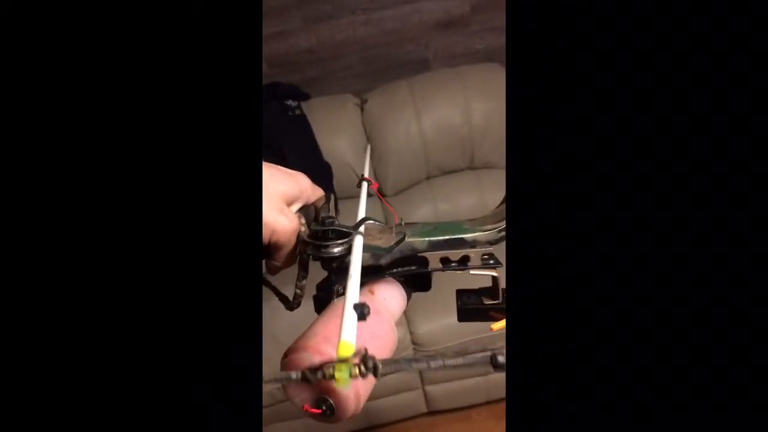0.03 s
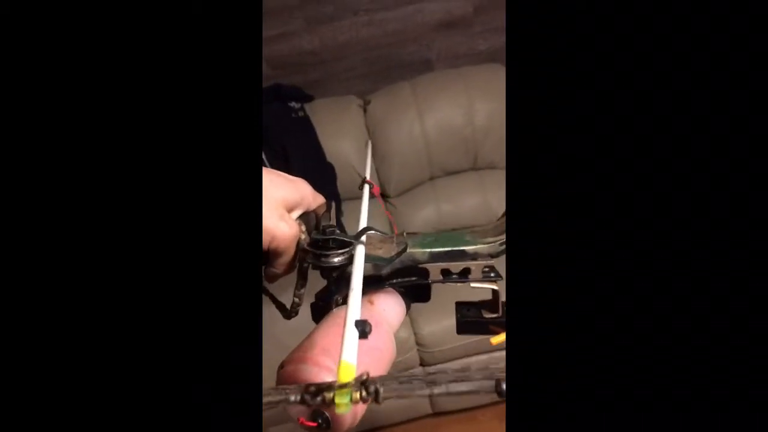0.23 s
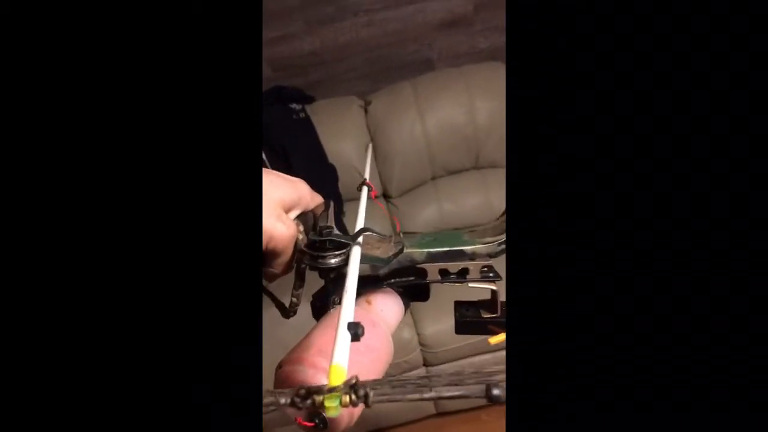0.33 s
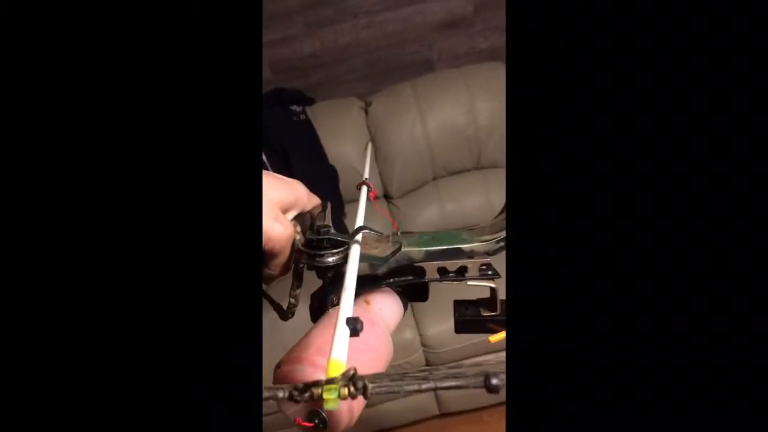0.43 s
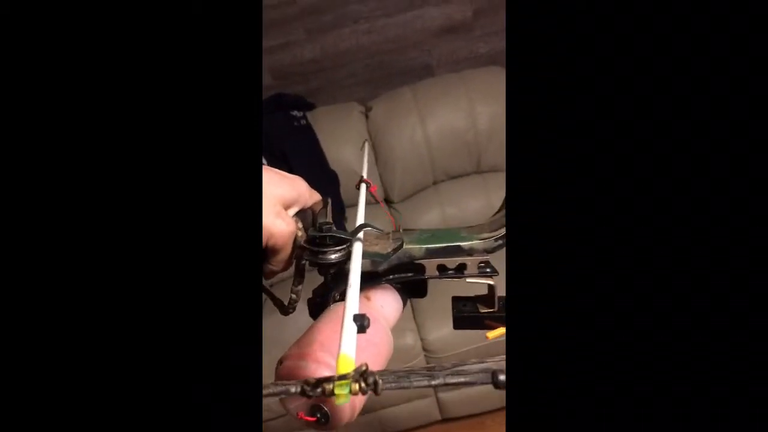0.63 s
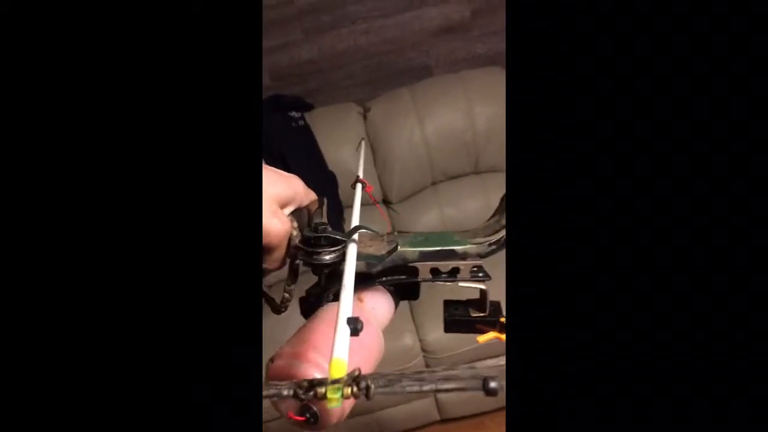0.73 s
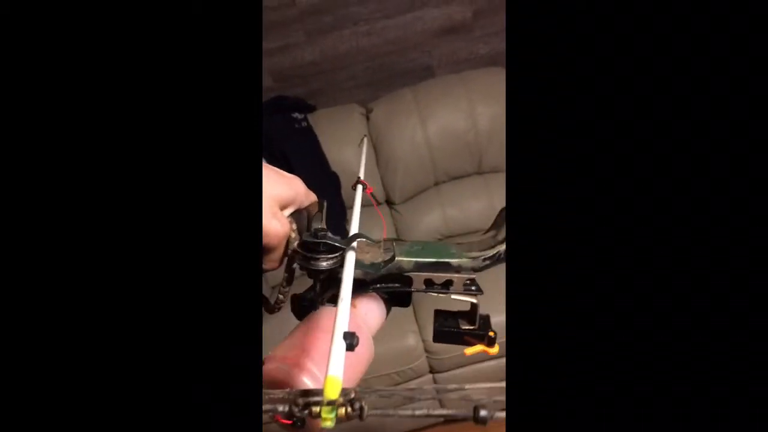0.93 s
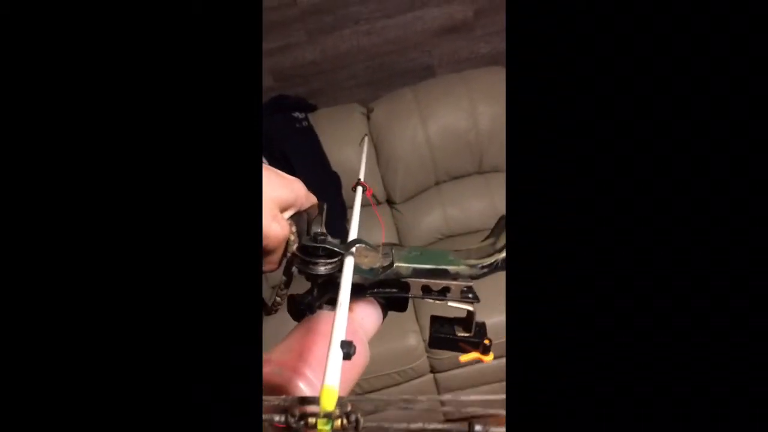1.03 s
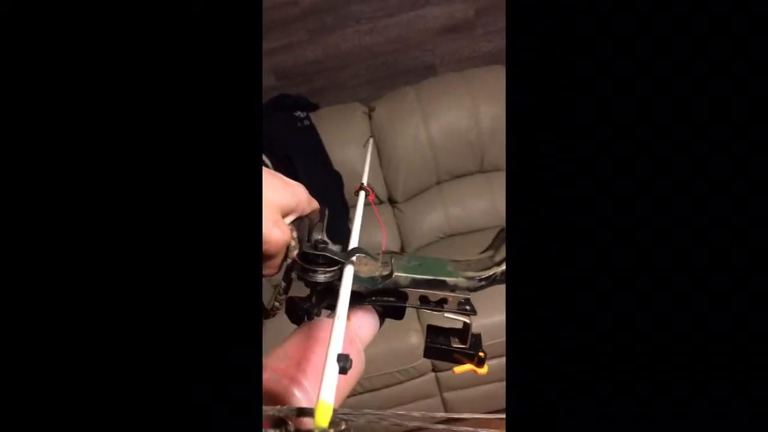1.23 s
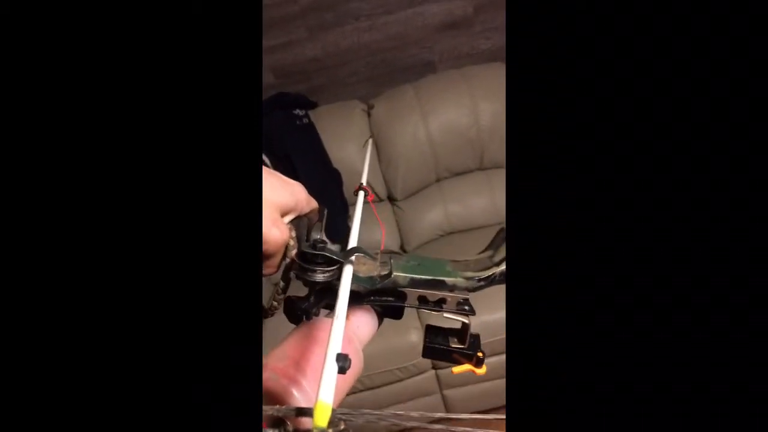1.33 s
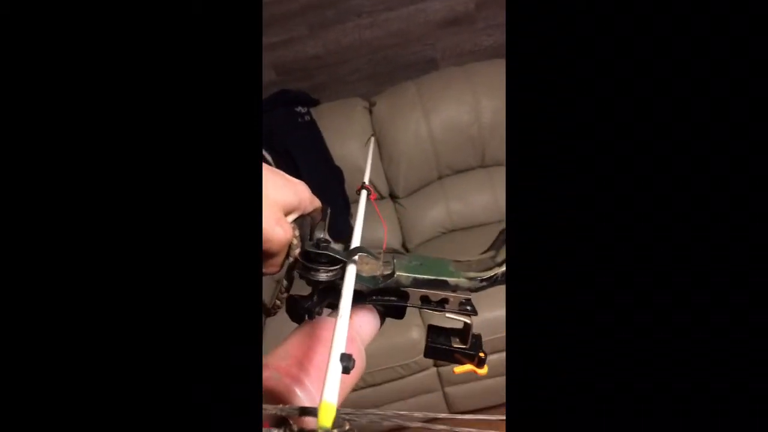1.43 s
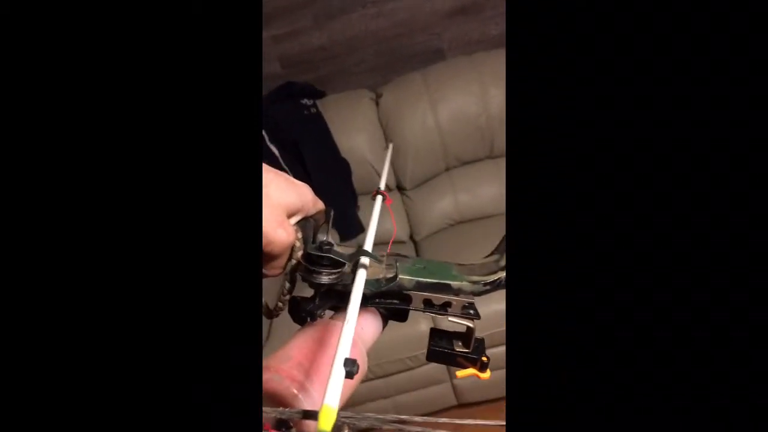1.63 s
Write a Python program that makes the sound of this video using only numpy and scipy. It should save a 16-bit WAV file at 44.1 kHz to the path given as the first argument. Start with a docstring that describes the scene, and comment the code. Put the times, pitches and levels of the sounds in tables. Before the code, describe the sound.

Quick metallic chatter of an arrow tapping on a bow's rest, then settling, indoors.

```python
"""Over a low hum and a faint rush of air, a metal arrow slides and ticks lightly on a bow rest nearby.
It taps the rest, gives one sharp clack, chatters quickly on the prongs and settles. Each hit cracks,
rings the metal and shakes the bow's hardware; a few also knock its frame. Hands bump the bow softly,
and a loose fitting clinks twice afterwards. The small room answers with a short echo."""
import sys
import numpy as np
from scipy import signal
from scipy.fft import rfft, irfft, next_fast_len
from scipy.io import wavfile
from scipy.ndimage import uniform_filter1d, map_coordinates

SR = 44100
rng = np.random.default_rng(int(sys.argv[2]) if len(sys.argv) > 2 else 0)


def master_out(mix):
    """Clip the mix to full scale and print it as 16-bit PCM to the path in sys.argv[1]."""
    frames = np.transpose(np.atleast_2d(mix))
    ceiling = np.clip(frames, -1, 1)
    pcm = np.round(ceiling * 32767).astype(np.int16)
    wavfile.write(sys.argv[1], SR, pcm)


N = 74970


def amp(db):
    """Turn decibels into a number to multiply a sound by."""
    return 10 ** (np.asarray(db) / 20)


def unit(x):
    """Scale a sound so that its average power is 1."""
    return x / np.sqrt(np.mean(x ** 2) + 1e-20)


def along(points, hz):
    """Read values between (pitch_hz, value) points, spacing the pitches by octaves."""
    pitches, values = np.transpose(points)
    return np.interp(np.log(hz + 1), np.log(pitches + 1), values)


def wobble(rate):
    """A smooth curve through `rate` random values a second."""
    return map_coordinates(rng.standard_normal(int(N * rate / SR) + 4), [np.arange(N) * rate / SR])


def rise(t, rise_s):
    """Climb from 0 towards 1, about two thirds of the way in rise_s."""
    return 1 - np.exp(-np.maximum(t, 0) / rise_s)


def fade(t, fade_s):
    """Die away, losing 60 dB every fade_s."""
    return np.exp(-np.log(1000) * np.maximum(t, 0) / fade_s)


def add(track, start_s, sound):
    """Mix a sound into the track at start_s."""
    part = track[max(round(start_s * SR), 0):][:len(sound)]
    part += sound[:len(part)]


def tone_filter(colour, size=2048):
    """Make a filter from (pitch_hz, level_db) points that never sounds ahead of its input."""
    cepstrum = irfft(np.log(amp(along(colour, np.fft.rfftfreq(size, 1 / SR)))))
    cepstrum[1:size // 2] *= 2  # fold the part before time zero onto the part after it
    cepstrum[size // 2 + 1:] = 0
    return irfft(np.exp(rfft(cepstrum)))


def through(x, response):
    """Pass a sound through a filter or an echo, keeping its length."""
    return signal.fftconvolve(x, response)[:len(x)]


def shaped_noise(envelope, colour):
    """Noise whose loudness follows the envelope; the colour only sets the balance of low and high."""
    spectrum = rfft(envelope * rng.standard_normal(len(envelope)))
    width = max(int(700 * len(envelope) / SR), 1)  # even out chance peaks over 700 Hz
    power = np.abs(uniform_filter1d(np.abs(spectrum) ** 2, width))
    even = irfft(spectrum * np.sqrt(np.sum(envelope ** 2) / (power + 1e-20)), len(envelope))
    sounding = envelope > envelope.max() * np.exp(-10)
    response = tone_filter(colour)
    return through(even * sounding, response / np.linalg.norm(response))


def ringing(tones, t):
    """Struck metal rings with fading tones; level and pitch shift a little with where the blow lands."""
    hz, db, fade_s = np.transpose(tones)[:, :, None]
    scatter_db, detune = 4.5, .0025
    louder, higher = rng.standard_normal((2, len(tones), 1))
    cycles = hz * (1 + detune * higher) * t + rng.random(hz.shape)
    waves = amp(db + scatter_db * louder) * fade(t, fade_s) * np.sin(2 * np.pi * cycles)
    return waves.sum(axis=0) * rise(t, rise_s=.00017)


def background():
    """A wavering hum, a steady rush of air and a faint low drone that swells and sinks."""
    # tones of the hum: pitch_hz, level_db
    hum_tones = [(58.8, -56), (388, -78)]
    # colour of the air: pitch_hz, relative_db
    air_colour = [(25, -21), (45, -1), (70, 5), (110, 6), (160, 1.5), (400, -2), (600, -8.5), (1000, -12),
                  (2000, -17.5), (4000, -24.5), (9000, -27.5), (15800, -32.5)]
    # colour of the drone: pitch_hz, relative_db
    drone_colour = [(120, -27.5), (190, -5), (230, 8.5), (265, -9), (300, -13), (380, -1.5), (500, -21),
                    (1000, -17), (3000, -42), (8000, -58.5)]
    # loudness of the drone over time: time_s, level_db
    drone_levels = [(0, -72), (.4, -69.5), (.75, -76.5), (.88, -68.5), (1.0, -66.5), (1.15, -64),
                    (1.42, -72.5), (1.55, -68), (1.7, -69)]
    t = np.arange(N) / SR
    hum, waver_db = np.zeros(N), 1.1
    for hz, db in hum_tones:
        peak = np.sqrt(2) * amp(db + waver_db * wobble(rate=11))
        hum += peak * np.sin(2 * np.pi * (hz * t + rng.random()))
    air = amp(-65) * unit(shaped_noise(np.ones(N), air_colour))
    swell = amp(np.interp(t, *np.transpose(drone_levels)))
    drone = swell * unit(shaped_noise(np.ones(N), drone_colour))
    return hum + air + drone


def slides():
    """The shaft rubs along the rest in short strokes that swell and fade."""
    # strokes of the shaft: middle_s, length_s, level_db
    strokes = [(0.012, .14, -72.5), (0.166, .016, -61.5), (.29, 0.073, -64.5), (0.3265, 0.0088, -50.5),
               (0.339, 0.015, -55), (0.377, .008, -45), (1.689, 0.11, -72)]
    # colour of the rubbing: pitch_hz, relative_db
    rub_colour = [(100, -32), (400, -7), (1100, -16), (1500, -3.5), (1700, -13), (2000, -4.5), (2250, -8.5),
                  (2580, 1), (3000, -7.5), (4200, -16.5), (9000, -28.5), (16000, -38)]
    t = np.arange(N) / SR
    envelope = np.zeros(N)
    for middle_s, length_s, db in strokes:
        envelope += amp(db) * np.cos(np.pi * np.clip((t - middle_s) / length_s, -.5, .5))
    return shaped_noise(envelope, rub_colour)


def room_echo(sound):
    """The walls return a sound as a short blur of reflections, made from fresh fading noise."""
    # how long the echo lasts: pitch_hz, fade_s
    fade_times = [(200, .4), (1500, 0.38), (4000, 0.2), (9000, 0.43), (15000, 0.27)]
    # colour of the echo: pitch_hz, gain_db
    echo_colour = [(200, 7), (1500, -1.5), (4000, -7), (7000, -8), (9000, -15), (10500, -9.5), (15000, 0.5)]
    t = np.arange(SR // 2) / SR
    hz, times, bands = signal.stft(rng.standard_normal(len(t)), SR, nperseg=256)
    bands = bands * fade(times, along(fade_times, hz)[:, None])
    tail = signal.istft(bands, SR, nperseg=256)[1][:len(t)] * rise(t, rise_s=.0087)
    response = amp(-5) * through(tail / np.linalg.norm(tail), tone_filter(echo_colour))
    return through(sound, response)


def ticks():
    """Little ticks of noise as the shaft starts to slip."""
    # slips of the shaft: start_s, level_db
    slips = [(0.1306, -49.5), (.1428, -51.5), (.1485, -52), (.1560, -56), (.3080, -58), (0.3112, -50.5),
             (.3143, -58.5)]
    # colour of a tick: pitch_hz, relative_db
    tick_colour = [(100, -31), (500, -10), (1500, 0), (4000, -1.5), (6000, -5), (10000, -8), (14500, -8),
                   (16200, -14)]
    out, t = np.zeros(N), np.arange(SR // 2) / SR
    envelope = rise(t, rise_s=.0006) * fade(t, fade_s=.016)
    for start_s, db in slips:
        add(out, start_s, amp(db) * shaped_noise(envelope, tick_colour))
    return out


def arrow_hits():
    """Each hit on the rest cracks, rings the metal, pings the prongs, shakes the hardware and echoes."""
    # hits of the arrow on the rest: start_s, body_db, treble_db, top_db
    hits = [(.1600, -57.5, -77, -78), (0.1698, -61.5, -71, -71.5), (0.1853, -46, -50, -55.5),
            (0.2029, -39, -40.5, -45), (.2355, -44, -48.5, -54), (0.3517, -40.5, -46, -52),
            (.3755, -46.5, -54.5, -59), (0.3834, -28.5, -23.5, -23), (.4025, -34.5, -42.5, -55.5),
            (.4137, -34, -40.5, -45.5), (.4262, -38.5, -44, -46.5), (.4362, -38.5, -38, -36),
            (.4520, -41.5, -42, -40.5), (.4605, -36, -44, -44), (.4725, -42.5, -49, -53),
            (.4777, -51, -41.5, -41), (0.4848, -36.5, -33, -34.5), (.5155, -44, -41.5, -49),
            (.5240, -36, -44, -43.5), (.5484, -37.5, -39.5, -38.5), (.5708, -53.5, -42, -50),
            (.5755, -44.5, -42, -43.5), (.5955, -42.5, -43.5, -47), (.6182, -41.5, -52.5, -74),
            (0.6694, -45, -43.5, -50), (.7005, -52, -75, -78)]
    # where the body ends, the treble starts, the treble ends and the top starts: pitch_hz
    band_edges = [3060, 6530, 9400, 13500]
    # tiny rebounds within one hit: delay_s, relative_db
    bounces = [(0, -1.5), (.0015, 2), (.0031, -10.5), (.0048, -15)]
    # ringing of shaft and rest: pitch_hz, relative_db, fade_s
    metal_tones = [(1333.3, -19.5, 0.065), (1470, -18, 0.14), (1518, -18, .22), (1981, -16.5, 0.19),
                   (2650, -10.5, 0.03), (2692, -8, .15), (2980, -17, .11), (3554, -15, .1),
                   (3456, -16, 0.078), (4040, -15.5, 0.12), (5230, -13.5, 0.044), (6820, -11.5, .045),
                   (12020, -18, 0.039), (13260, -20.5, .035)]
    # bright ping of the prongs: pitch_hz, relative_db, fade_s
    prong_tones = [(7460, -12.5, .02), (8350, -10.5, .028), (9180, -6.5, 0.018), (11120, -15.5, .03),
                   (14530, -20, 0.018)]
    # colour of the crack: pitch_hz, relative_db
    crack_colour = [(80, -45), (400, -31), (1000, -15), (2600, -10.5), (4500, -2.5), (4950, -17),
                    (5250, -10.5), (5800, -7.5), (7100, 2), (7900, -11), (9150, 1.5), (10400, -18.5),
                    (11250, -10), (12700, -24), (14500, -14.5), (15600, -19.5), (16000, -33)]
    # colour of the shaking hardware: pitch_hz, relative_db
    shake_colour = [(80, -45.5), (200, -37), (480, -24), (680, -9), (870, -19), (1080, -16), (1200, -11.5),
                    (1460, -9), (1610, -11), (1950, 0.5), (2170, -6.5), (2620, 2.5), (3100, -1.5),
                    (3570, -2.5), (3760, 0), (4200, -7.5), (4650, -7), (4950, -20), (5250, -11),
                    (5800, -19.5), (7000, -12), (9200, -13.5), (10400, -26), (12000, -22.5), (15500, -30),
                    (16000, -38.5)]
    # share of the ringing that reaches the walls: pitch_hz, gain_db
    ring_to_walls = [(1200, -3), (2700, -1.5), (5000, -8.5), (14000, -8.5)]
    out, t = np.zeros(N), np.arange(SR // 2) / SR
    crack_envelope = sum(amp(db) * rise(t - delay_s, rise_s=.0001) * fade(t - delay_s, fade_s=.006)
                         for delay_s, db in bounces)
    shake_rise_s = .004
    shake_envelope = rise(t, shake_rise_s) * fade(t - shake_rise_s, fade_s=.054)
    for start_s, body_db, treble_db, top_db in hits:
        ping_db = .2 * (treble_db + 34)  # the ping grows faster than the blow itself
        ring = ringing(metal_tones, t) + amp(ping_db) * ringing(prong_tones, t)
        crack = amp(3) * shaped_noise(crack_envelope, crack_colour)
        shake = amp(-1) * shaped_noise(shake_envelope, shake_colour)
        echo = room_echo(crack + shake + through(ring, tone_filter(ring_to_walls)))
        hardness = tone_filter(list(zip(band_edges, [body_db, treble_db, treble_db, top_db])))
        add(out, start_s, through(ring + crack + shake + echo, hardness))
    return out


def frame_knocks():
    """Some heavier blows make the bow's frame ring with a hollow knock."""
    # knocks on the frame: start_s, level_db
    knocks = [(.2035, -56), (.3845, -46.5), (.4855, -54.5)]
    # ringing of the frame: pitch_hz, relative_db, fade_s
    frame_tones = [(627, -6.5, 0.12), (767, -10.5, 0.064), (779, -10.5, 0.21), (944.5, -7.5, 0.14),
                   (1227, -4.5, .1), (1294, -9, 0.086), (1360, 1.5, 0.058)]
    out, t = np.zeros(N), np.arange(SR // 2) / SR
    for start_s, db in knocks:
        add(out, start_s, amp(db) * ringing(frame_tones, t))
    return out


def hand_bumps():
    """Soft hands bump the bow, each bump one low tone that starts gently and fades."""
    # bumps on the bow: start_s, level_db, pitch_hz
    bumps = [(.208, -38, 97), (0.267, -43, 97), (0.297, -45.5, 108.4), (.335, -52.5, 112),
             (0.384, -57, 122)]
    out, t = np.zeros(N), np.arange(SR // 2) / SR
    envelope = rise(t, rise_s=.011) * fade(t, fade_s=.13)
    for start_s, db, hz in bumps:
        add(out, start_s, amp(db) * envelope * np.sin(2 * np.pi * hz * t))
    return out


def fitting_clinks():
    """A small loose fitting is tapped twice and rings high and briefly."""
    # taps of the fitting: start_s, level_db
    taps = [(1.0107, -58), (1.0232, -58)]
    # ringing of the fitting: pitch_hz, relative_db, fade_s
    fitting_tones = [(4080, -7, 0.021), (4370, -8, 0.027), (6180, -9.5, .018), (6820, -12, .016),
                     (8800, -18, .012)]
    out, t = np.zeros(N), np.arange(SR // 2) / SR
    for start_s, db in taps:
        add(out, start_s, amp(db) * ringing(fitting_tones, t))
    return out


def scene():
    """Arrow, bow, hands, room and background mixed into one channel."""
    rattle = arrow_hits()  # already holds its own echo
    small_sounds = slides() + ticks() + frame_knocks() + fitting_clinks()
    return (rattle + small_sounds + room_echo(small_sounds) + hand_bumps() + background())[None]


def record(dry):
    """Cut away the very highest treble, everything above top_hz."""
    top_hz = 16000
    size = next_fast_len(N + SR // 2)
    kept = np.fft.rfftfreq(size, 1 / SR) < top_hz
    return irfft(rfft(dry, size) * kept, size)[..., :N]


dry = scene()
out = record(dry)
master_out(out)
```